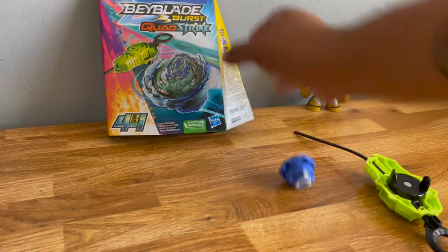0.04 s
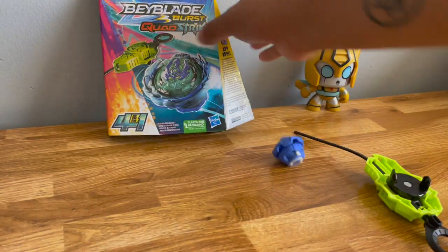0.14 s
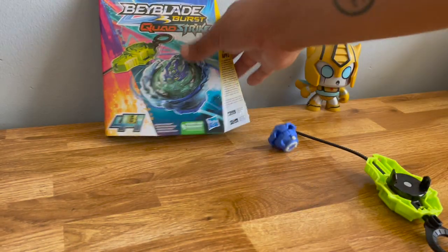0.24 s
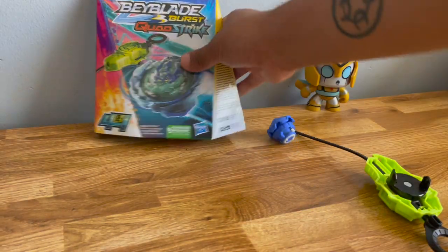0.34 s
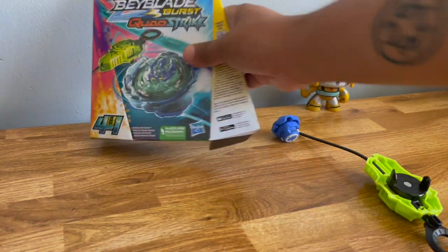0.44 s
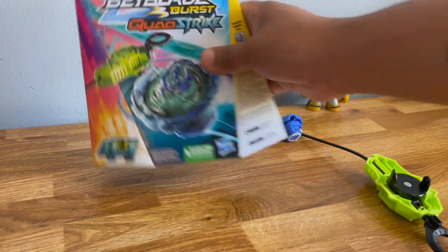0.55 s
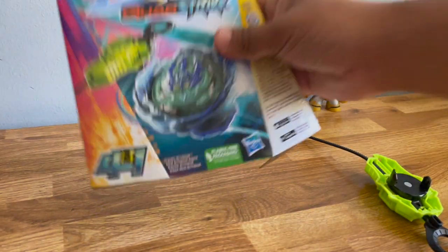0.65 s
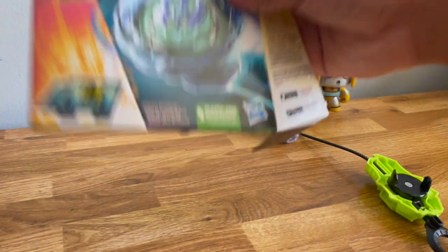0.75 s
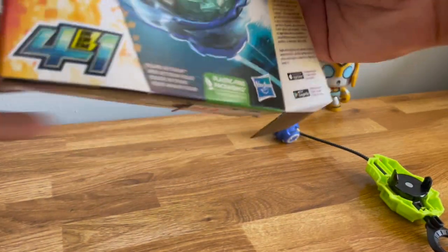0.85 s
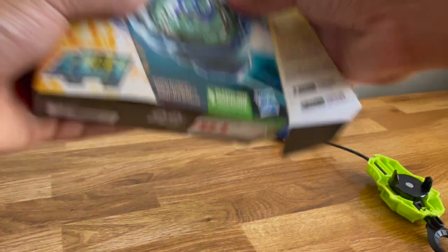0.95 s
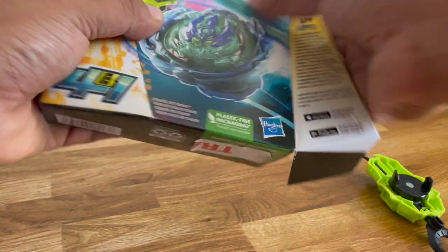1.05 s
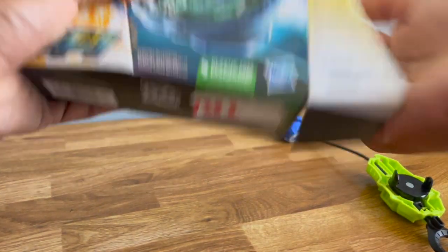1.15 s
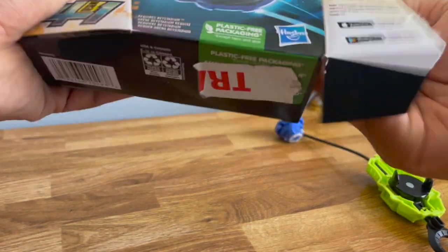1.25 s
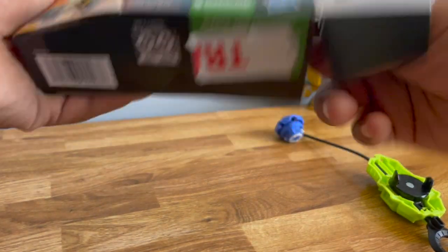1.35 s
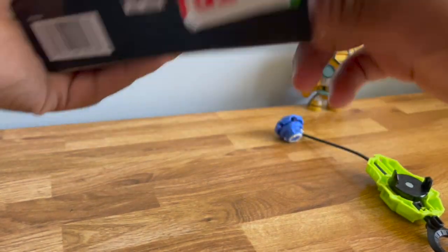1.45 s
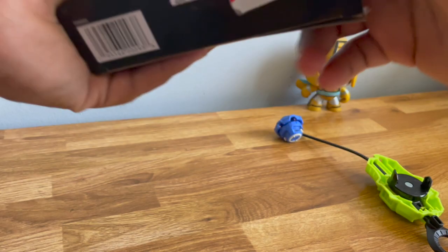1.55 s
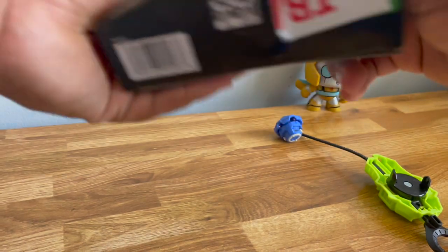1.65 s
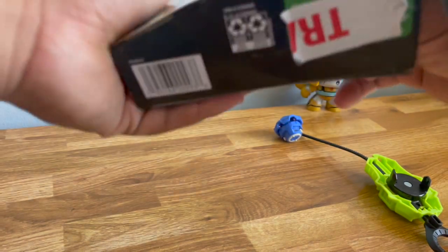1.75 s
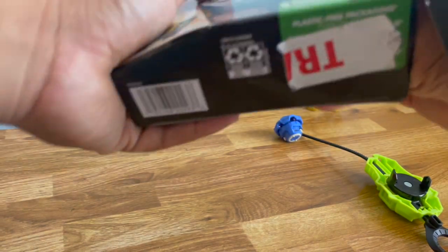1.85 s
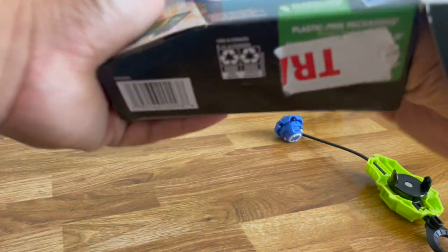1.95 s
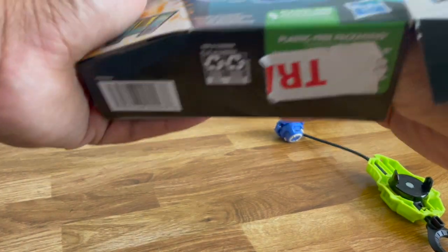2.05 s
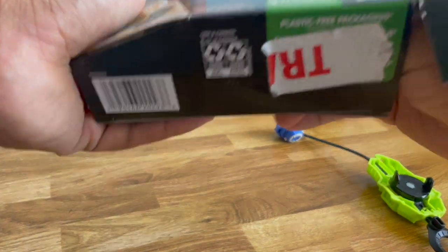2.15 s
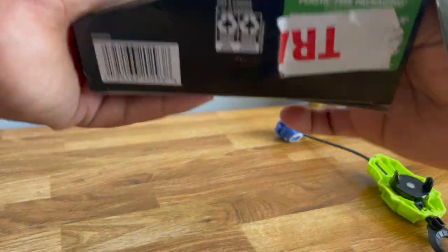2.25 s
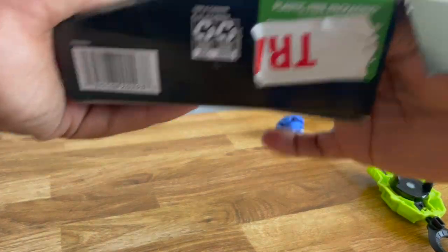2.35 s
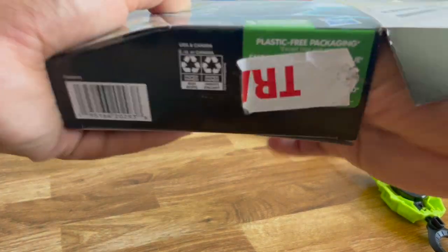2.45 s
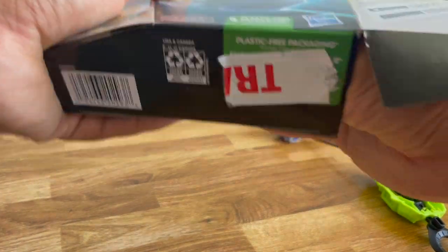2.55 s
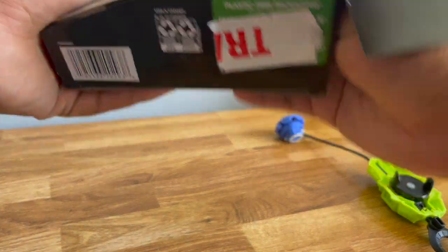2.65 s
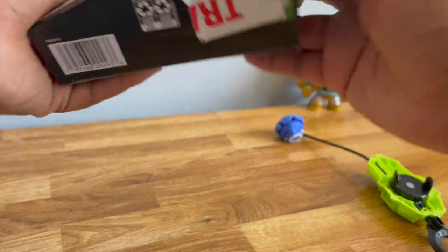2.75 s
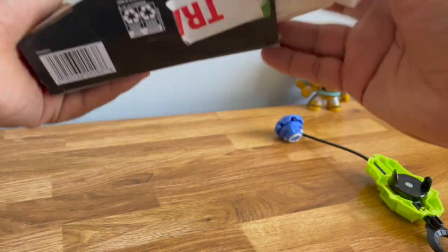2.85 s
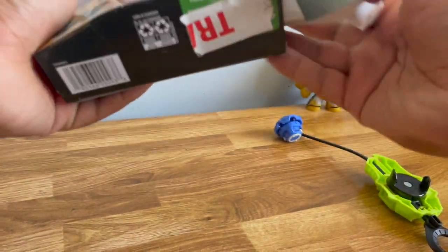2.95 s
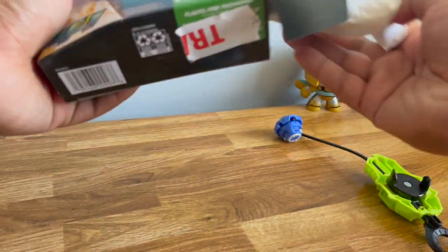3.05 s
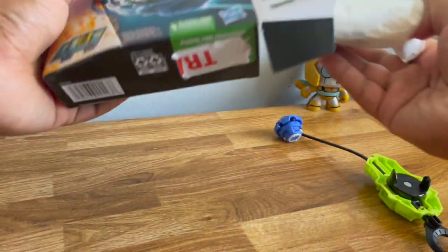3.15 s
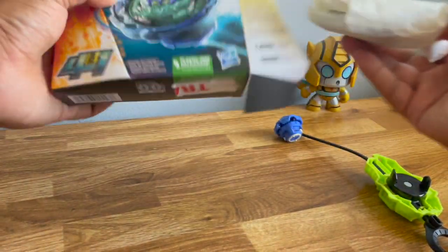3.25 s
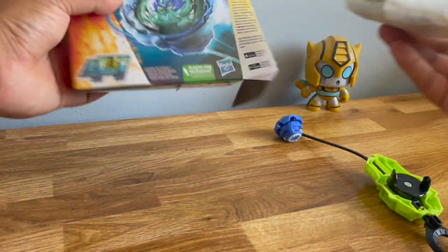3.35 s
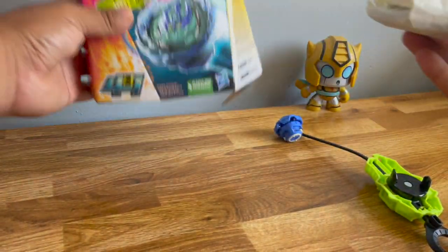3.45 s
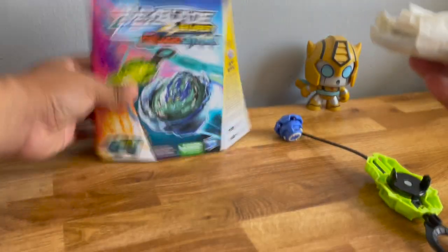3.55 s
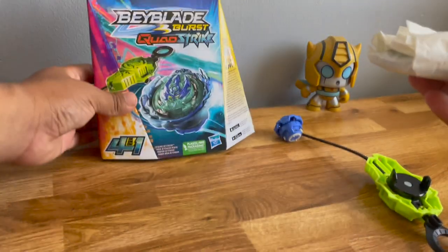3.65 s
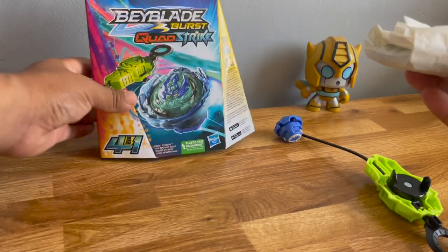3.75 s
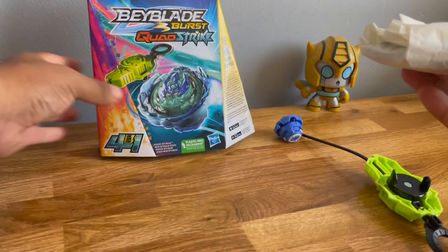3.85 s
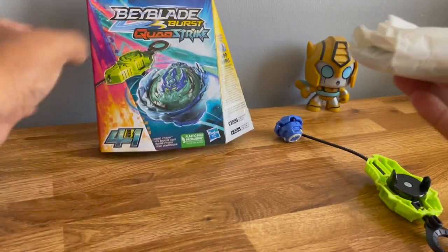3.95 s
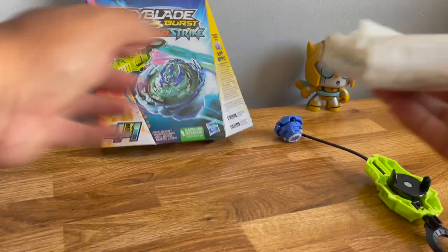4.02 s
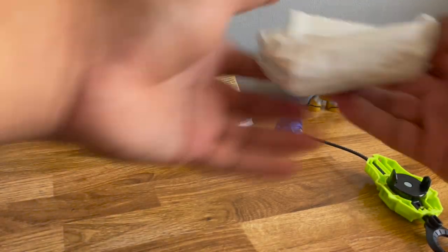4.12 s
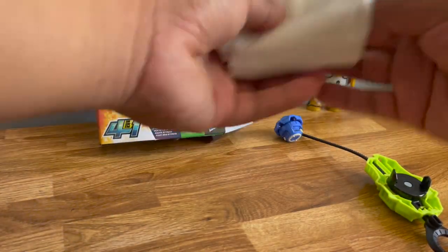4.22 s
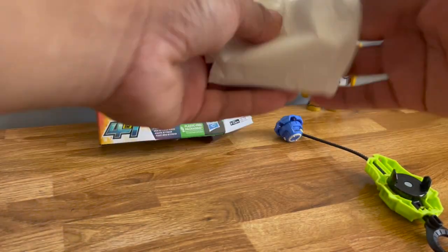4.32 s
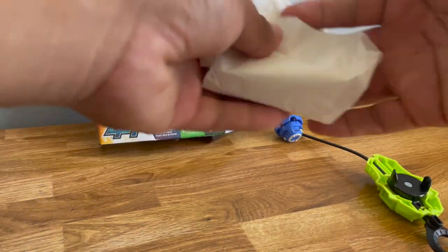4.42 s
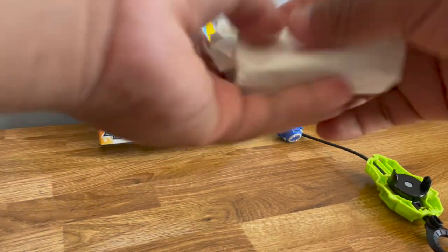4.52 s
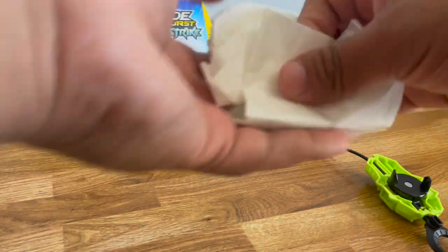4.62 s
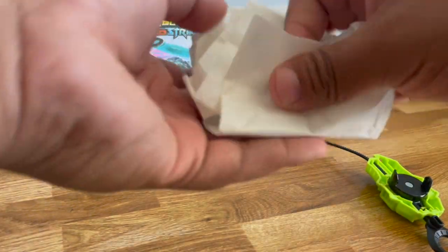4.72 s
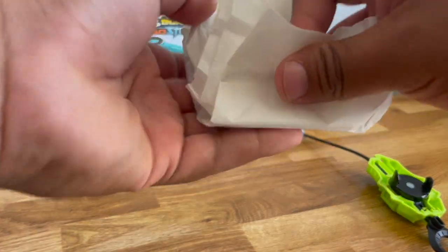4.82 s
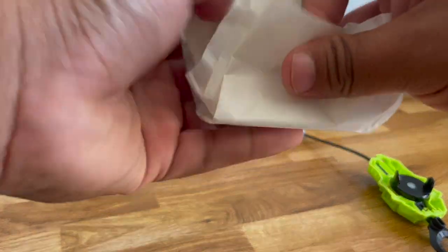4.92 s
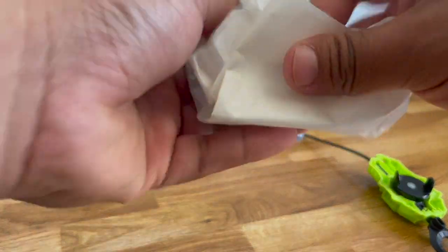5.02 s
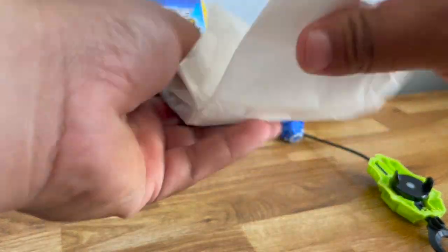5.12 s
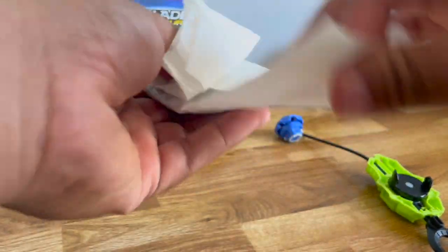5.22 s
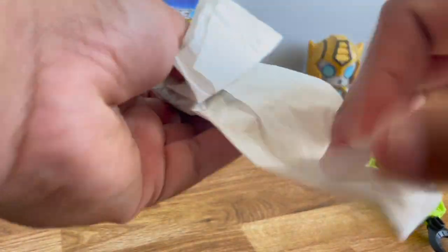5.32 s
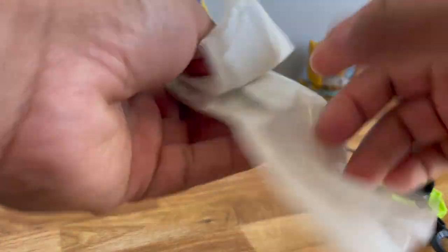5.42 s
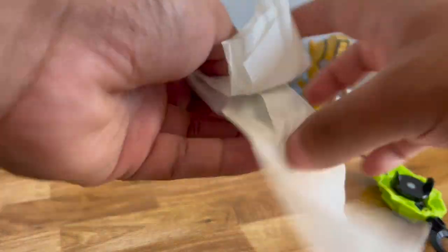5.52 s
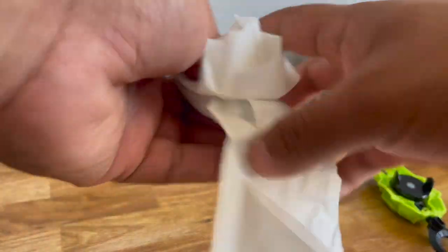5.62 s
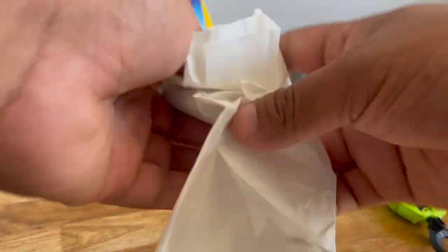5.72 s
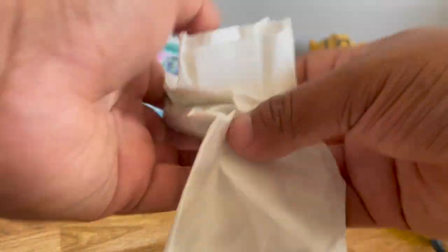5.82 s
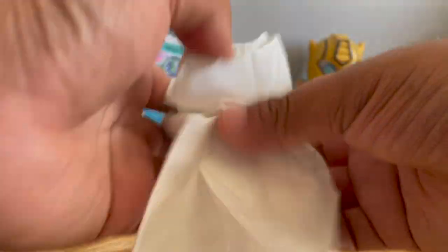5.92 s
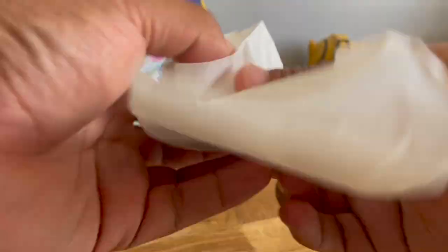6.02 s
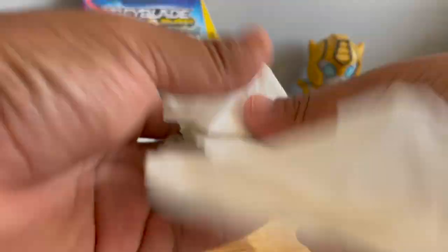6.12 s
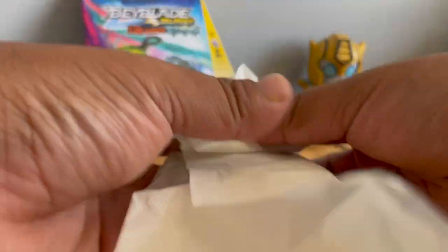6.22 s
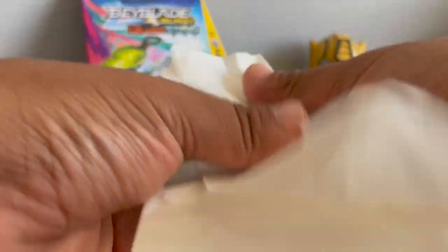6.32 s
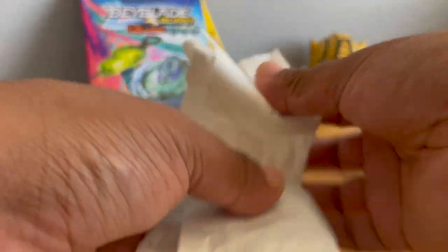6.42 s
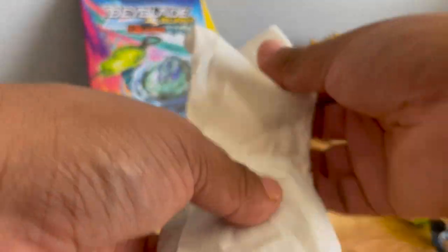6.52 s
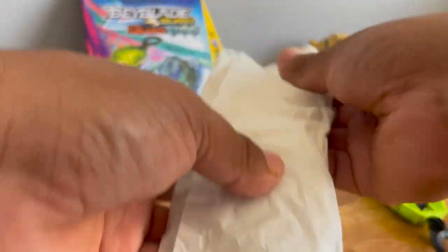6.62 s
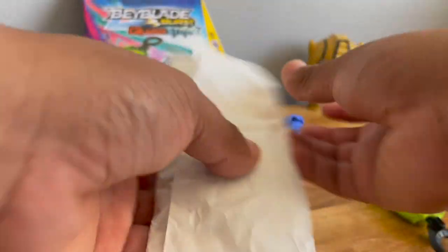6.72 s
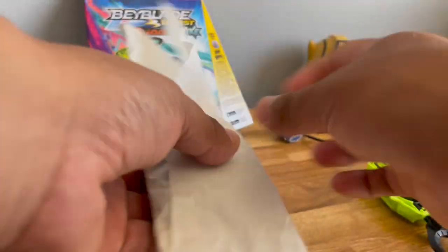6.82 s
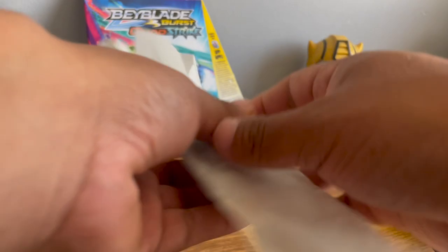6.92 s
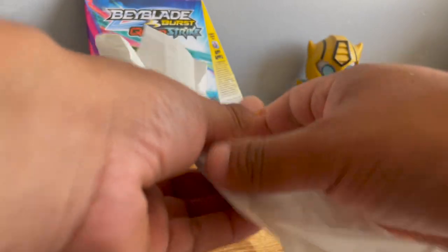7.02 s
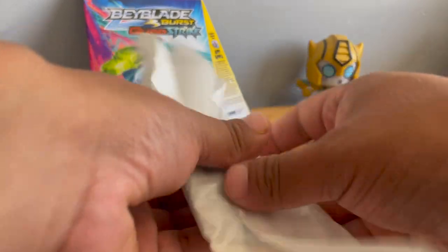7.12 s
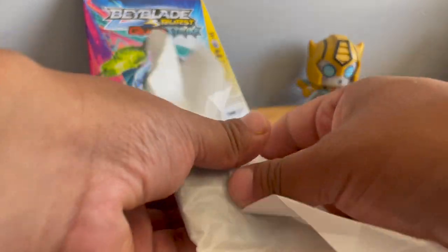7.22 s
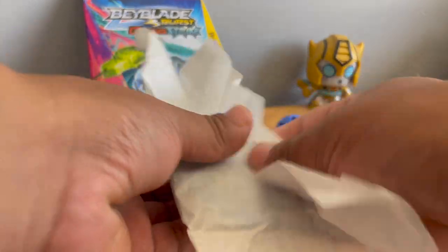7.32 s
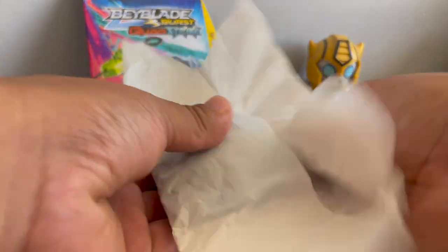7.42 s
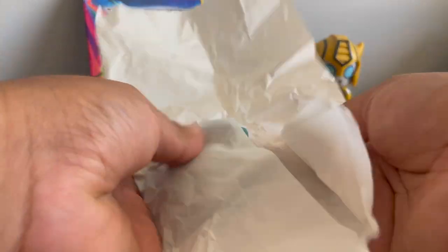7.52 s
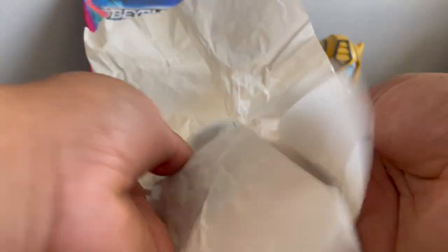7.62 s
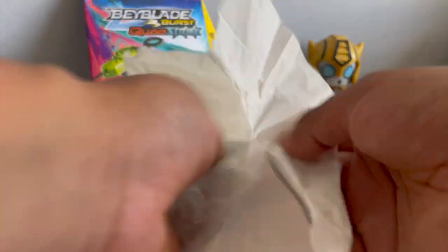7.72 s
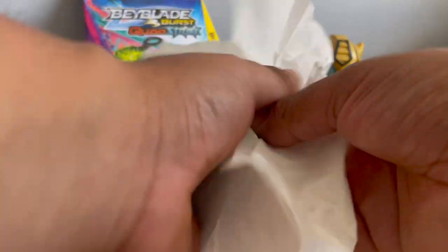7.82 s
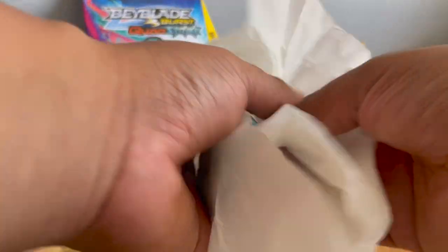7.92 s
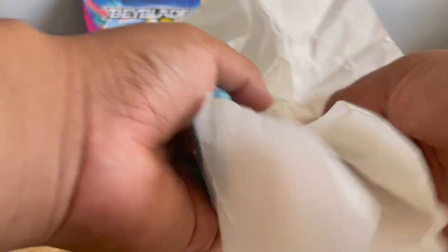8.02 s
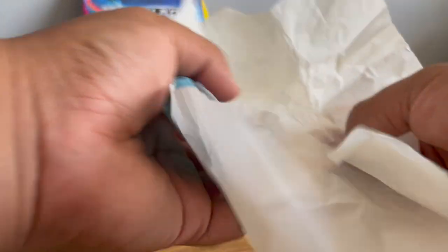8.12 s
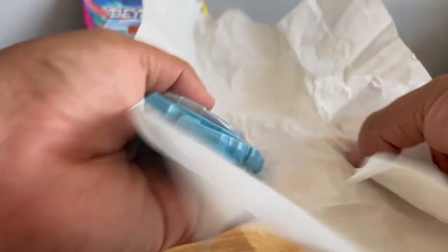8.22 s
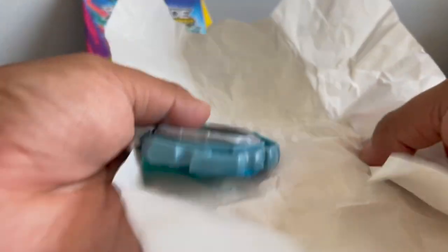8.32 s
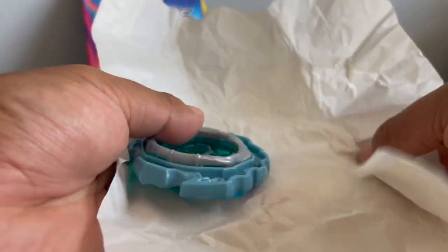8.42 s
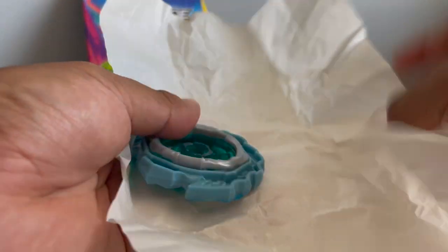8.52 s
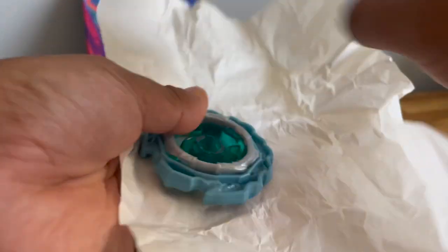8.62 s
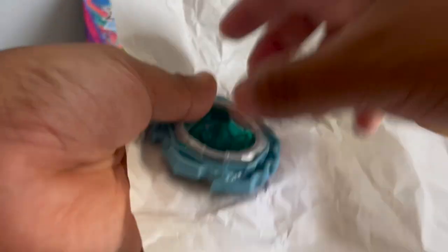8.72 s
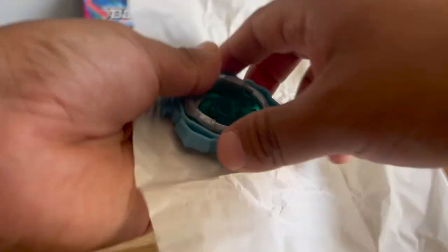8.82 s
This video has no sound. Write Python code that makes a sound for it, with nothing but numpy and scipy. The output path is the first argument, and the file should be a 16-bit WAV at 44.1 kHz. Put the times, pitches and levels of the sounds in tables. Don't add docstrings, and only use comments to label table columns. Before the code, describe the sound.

Close to a phone-like microphone on a table in a small, dry room, light plastic taps give way to cardboard knocks and scraping, uneven shakes. A muffled wooden thump follows as the box is put down. After a brief lull, thin paper snaps and rustles in clumps, becoming busiest and sharpest midway through unwrapping, then easing into scattered light crackles, with clean gaps between movements.

```python
import sys
import numpy as np
from scipy import signal
from scipy.fft import rfft, irfft, next_fast_len
from scipy.io import wavfile
from scipy.ndimage import uniform_filter1d

SR = 44100
rng = np.random.default_rng(int(sys.argv[2]) if len(sys.argv) > 2 else 0)


def inscribe(sig):
    pcm = np.round(np.clip(np.atleast_2d(sig).T, -1, 1) * 32767)
    wavfile.write(sys.argv[1], SR, pcm.astype(np.int16))


def volts_from_decibels(level):
    exponent = np.asarray(level, float) / 20
    return 10 ** exponent


N = 390726
SWAP_S = 4.05


def evened(x):
    return x / np.sqrt(np.mean(x ** 2) + 1e-20)


def read(points, hz):
    f, value = np.transpose(points)
    return np.interp(np.log(hz + 1), np.log(f + 1), value)


def add(mix, s, sound):
    part = mix[..., round(s * SR):][..., :sound.shape[-1]]
    part += sound[..., :part.shape[-1]]


def colour(x, points):
    hz = np.fft.rfftfreq(1024, 1 / SR)
    response = np.roll(irfft(volts_from_decibels(read(points, hz))), 512) * np.hanning(1024)
    return signal.oaconvolve(x, response[None], "same", axes=1)


def ring(modes, bright_db=0):
    t = np.arange(SR // 3) / SR
    out = np.zeros(len(t))
    for hz, db, t60 in modes:
        level_db = db + bright_db * np.log10(hz / modes[0][0]) - 60 * t / t60
        out += volts_from_decibels(level_db) * np.sin(2 * np.pi * hz * t)
    return out


def crease(noise, hz, t60, tuned, sharp, rise):
    t = np.arange(noise.shape[1]) / SR
    burst = noise * volts_from_decibels(-60 * t / t60) * np.minimum(t / rise, 1)
    peak = signal.iirpeak(np.clip(hz, 50, 15000), sharp, SR)
    rung = signal.lfilter(*peak, signal.lfilter(*peak, burst))
    out = (1 - tuned) * burst / abs(burst).max() + tuned * rung / abs(rung).max()
    return out / abs(out).max(1)[:, None]


def moves(t, release_db_per_s, per_crackle=1, per_weight=0):
    # start_s, length_s, final_crackle_db, swell_db, weight_db
    lifts = [(0, 0.074, -36, 8, -6.5), (0.095, 0.33, -50, -6.5, 1), (0.477, 0.016, -64.5, 12, 12),
             (0.569, 0.034, -53.5, 3.5, 2), (0.861, 0.014, -47, -0.5, -15), (0.923, 0.0032, -36, -0.5, 1),
             (0.964, 0.28, -49.5, -1, -16), (3.152, 0.04, -49, 20, -14), (3.387, 0.018, -64.5, 6, -3),
             (3.428, 0.13, -77.5, 4, -11), (3.56, 0.036, -37.5, 11.5, 12.5), (3.874, 0.06, -57, 11, -40),
             (4.005, 0.063, -56.5, 3.5, -28)]
    shakes = [(1.272, 0.015, -35, 11, -10.5), (1.32, 0.21, -44, -4, -5), (1.563, 0.073, -33, 18, -5.5),
              (1.629, 0.084, -46.5, 14.5, -2), (1.763, 0.12, -34.5, 7.5, -12.5),
              (1.933, 0.27, -56.5, -9.5, -23.5), (2.05, 0.11, -38, 0.5, -21),
              (2.2, 0.1, -51.5, -8.5, -19.5), (2.26, 0.023, -32, 0, -12.5),
              (2.341, 0.056, -34.5, 9.5, -14.5), (2.433, 0.057, -34.5, 4.5, -21),
              (2.577, 0.22, -30.5, 9, -25.5), (2.831, 0.14, -52.5, -15, -8.5),
              (2.951, 0.12, -42.5, -7.5, -14)]
    pulls = [(4.067, 0.087, -53.5, -5.5, -1), (4.144, 0.24, -32.5, 10, -24.5),
             (4.423, 0.19, -46.5, -9, -24.5), (4.546, 0.02, -31.5, 3.5, -25),
             (4.597, 0.046, -33, -4, -28.5), (4.67, 0.15, -37.5, 0.5, -29.5), (4.854, 0.22, -37, 5, -31),
             (5.121, 0.091, -35, 12.5, -21.5), (5.258, 0.11, -40, -7.5, -22.5), (5.38, 0.33, -39, 1, -23.5),
             (5.699, 0.12, -43, -12, -23.5), (5.843, 0.13, -31.5, 9.5, -29.5),
             (6.002, 0.14, -44, -12.5, -31), (6.155, 0.11, -36.5, 8, -36.5),
             (6.281, 0.039, -44.5, -7.5, -17.5)]
    spreads = [(6.38, 0.14, -39.5, -5, -24.5), (6.488, 0.14, -32.5, -0.5, -23),
               (6.645, 0.087, -54.5, -16, -36.5), (6.691, 0.068, -54, -15, -37),
               (6.801, 0.028, -46, 3, -42), (6.896, 0.033, -33, 18, -33), (6.985, 0.012, -54.5, -7.5, -43),
               (7.015, 0.11, -26.5, 24, -27), (7.154, 0.015, -36.5, -1, -22.5),
               (7.212, 0.23, -32, 1.5, -24), (7.492, 0.16, -43.5, -11, -21), (7.684, 0.24, -35, 6, -21.5),
               (7.873, 0.046, -41.5, -7, -17), (7.981, 0.025, -40, -8.5, -19), (8.032, 0.026, -53, 24, -3),
               (8.103, 0.063, -48, -2.5, -13), (8.191, 0.07, -35, 14.5, -19.5),
               (8.302, 0.021, -29.5, 3.5, -26.5), (8.328, 0.04, -45, 17.5, -35.5),
               (8.409, 0.005, -41, -9, -22.5), (8.458, 0.07, -52.5, -6, -16),
               (8.513, 0.069, -65.5, 8.5, -1), (8.629, 0.026, -51, -6.5, -70),
               (8.74, 0.059, -33.5, 20, -19), (8.803, 0.069, -35, 12, -24.5)]
    attack_db_per_s, still_db = 1398, -102
    start, length, db, swell, weight = np.transpose(lifts + shakes + pulls + spreads)[..., None]
    progress = np.clip((t - start) / np.maximum(length, .005), 0, 1)
    held = db - swell * (1 - progress)
    held -= attack_db_per_s * np.maximum(start - t, 0)
    held -= release_db_per_s * np.maximum(t - start - length, 0)
    level = per_crackle * (held + 40) - 40 + per_weight * weight
    return 10 * np.log10((volts_from_decibels(level) ** 2).sum(0) + volts_from_decibels(still_db) ** 2)


def small_creases(force):
    per_s, count = 1600, 20
    spread_db, clump_db, rub = 3.5, 3.5, 0.28
    clumps = evened(uniform_filter1d(uniform_filter1d(rng.standard_normal(N), 500), 200))
    size_db = spread_db * np.minimum(rng.exponential(1, N), 3.4) + clump_db * np.minimum(clumps, 1.8)
    size = volts_from_decibels(size_db) * (rng.random(N) < per_s / SR)
    kind, out = rng.integers(0, count, N), np.zeros((2, N))
    for k, hz in enumerate(np.geomspace(250, 12000, count)):
        grain = crease(rng.standard_normal((2, 512)), hz, t60=.0022, tuned=.22, sharp=2.3, rise=.0004)
        grain /= np.linalg.norm(grain[0])
        out += signal.oaconvolve((size * (kind == k))[None], grain, axes=1)[:, :N]
    slide = np.where(np.arange(N) / SR < SWAP_S, 2.5, 1)
    crackle = force * evened(out + volts_from_decibels(-17.5) * room(out))
    return crackle + rub * slide * rng.standard_normal((2, N))


def crinkle():
    hands_hz = [230, 900, 2100, 6500, 11000]
    # pitch_hz, level_db
    card = [(70, 6), (140, 4), (400, 1.5), (700, 0), (1120, -5), (1550, 5.5), (1950, 3), (2250, 2),
            (3000, 4), (7500, -3.5), (11000, -12), (13500, -22), (16000, -20)]
    # pitch_hz, level_db
    sheet = [(70, 22), (130, 20), (400, 6), (700, 7), (1000, 2), (1500, 7.5), (4000, 5.5), (7500, 1.5),
             (11000, -9.5), (13500, -19.5), (16000, -16)]
    # start_s, stop_s, pitch_hz,
    # width_hz, level_db
    cavity = [
        (8.03, 12, 1800, 450, -1),
        (8.03, 8.6, 1060, 560, 2),
        (3.85, 4.05, 3150, 300, -10),
        (2.6, 4.4, 2300, 200, 4),
        (2.45, 4.4, 1170, 230, -8),
        (2.9, 4.1, 2800, 2100, 4),
        (0.54, 0.88, 1600, 630, -10),
        (0.42, 0.63, 830, 530, -21.5),
        (6.4, 7.5, 880, 160, 4.5),
    ]
    bumpy_db, patchy_db, cavity_wander = 7.5, 2.5, 0.027
    release, low_release = 386.5, 311.5
    s = np.arange(0, N / SR + .1, .002)
    crackle = moves(s, release)
    thump = moves(s, low_release, per_weight=0.97) + 6
    knuckles = evened(uniform_filter1d(rng.standard_normal(len(s)), size=24))
    thump += bumpy_db * np.minimum(knuckles, 1)
    body = moves(s, low_release, per_weight=0.59) + 15
    fizz = moves(s, release, per_crackle=1.37, per_weight=-0.19) + 0.5
    upper = crackle + 0.26 * np.minimum(crackle + 48, 0)

    force = np.clip((np.interp(np.arange(N) / SR, s, crackle) + 62) / 18, .05, 1)
    hz, t, z = signal.stft(small_creases(force), SR, nperseg=512, noverlap=384)
    slow_power = uniform_filter1d(uniform_filter1d(abs(z[0]) ** 2, 24, 1), 40, 0)
    z /= np.sqrt(slow_power + 1e-20)
    levels = [np.interp(t, s, layer) for layer in (thump, body, crackle, upper, fizz)]
    shares = [np.interp(np.log(hz + 1), np.log(hands_hz), row) for row in np.eye(len(levels))]
    field_db = np.transpose(shares) @ np.array(levels)

    field_db += np.where(t < SWAP_S, read(card, hz)[:, None], read(sheet, hz)[:, None])
    wander = 1 + cavity_wander * evened(uniform_filter1d(rng.standard_normal(len(t)), size=40))
    for start, stop, cavity_hz, width, cavity_db in cavity:
        hump = np.exp(-((hz[:, None] - cavity_hz * wander) / width) ** 2)
        field_db += cavity_db * hump * (t > start) * (t < stop)
    patches = evened(uniform_filter1d(uniform_filter1d(rng.standard_normal(z[0].shape), 7, 0), 9, 1))
    field_db += patchy_db * patches * np.minimum(hz / 900, 1)[:, None]
    return signal.istft(z * volts_from_decibels(field_db - 19.0), SR, nperseg=512, noverlap=384)[1][:, :N]


def snaps():
    # start_s, peak_db, ring_hz
    card_snaps = [(0.9268, -21.5, 1520), (1.0605, -15, 2440), (1.1157, -21, 2040), (1.2835, -48, 2750),
                  (1.7085, -19.5, 1310), (1.9107, -16, 1480), (1.9756, -33.5, 7400), (2.019, -18, 1410),
                  (2.2612, -17, 1250), (2.2775, -15, 1550), (2.378, -13, 1550), (2.7902, -11, 3230),
                  (2.9313, -22, 2870), (2.996, -11, 2220), (3.1356, -20.5, 2300), (3.2964, -41.5, 2090),
                  (3.3847, -36, 2820), (3.8574, -49, 1990), (4.0632, -39, 902)]
    tissue_snaps = [(4.3447, -15.5, 2000), (4.429, -7.5, 1490), (4.5969, -14, 2190), (4.6182, -4.5, 1940),
                    (4.634, -4, 1870), (4.687, -9, 3330), (5.165, -23, 5980), (5.2508, -10, 3380),
                    (5.4403, -6.5, 2700), (5.4556, -13, 3970), (5.5629, -15, 2200), (5.6613, -11.5, 2980),
                    (5.7003, -8.5, 1430), (5.896, -5.5, 4800), (5.926, -12, 5070), (5.966, -7, 4830),
                    (6.0564, -7, 5000),
                    (6.369, 0, 3350), (6.428, -3, 3460), (6.489, -9, 1330), (6.557, -4, 3700),
                  (6.619, -7, 3760), (6.697, -6, 3200), (6.748, -11.5, 1300), (6.8235, -7, 4100),
                  (6.9292, -6, 4570), (7.024, -29, 3080), (7.053, -10, 2130), (7.077, -10, 1680),
                  (7.104, -7, 2150), (7.198, -2.5, 2880), (7.217, -6.5, 2100), (7.247, -9, 2280),
                  (7.2776, -10, 6250), (7.347, -6, 3000), (7.388, -10.5, 4830), (7.402, -6, 3660),
                  (7.509, -5, 1280), (7.547, -15, 6200), (7.562, -7, 3270), (7.606, -2.5, 1340),
                  (7.628, -5, 3020), (7.6615, 1.5, 920), (7.715, -4.5, 2580),
                    (7.805, -12.5, 5030), (7.834, -11.5, 6650), (7.8439, -6.5, 3570), (7.879, -10, 3400),
                    (7.918, -1.5, 2790), (7.9815, -3, 1240), (7.9923, -9, 1340), (8.121, -8.5, 1170),
                    (8.217, -13, 4500), (8.3115, -12, 4500), (8.332, -9, 6800), (8.338, -0.5, 3120),
                    (8.3623, -19, 4840), (8.4015, -7.5, 4870), (8.4492, -11, 1400), (8.4832, -30, 5350),
                    (8.4933, -12.5, 4840), (8.5079, -18, 5160), (8.5587, -21.5, 10800), (8.614, -38, 6200),
                    (8.6266, -25, 6440), (8.6364, -17.5, 3980), (8.663, -23, 6960), (8.72, -25.5, 7000),
                    (8.7299, -15.5, 2980), (8.743, -17, 1330), (8.795, -13.5, 1330)]
    more_card_snaps = [
        (0.487, -34, 1440),
        (0.502, -48, 3700),
        (0.975, -31.5, 4820),
        (1.162, -32, 2989),
        (3.165, -34.5, 4900),
        (3.203, -29, 3500),
        (3.93, -44.5, 2060),
        (4.02, -33.5, 2130),
    ]
    shake_snaps = [(1.294, -16.5, 2800), (1.435, -36, 1360), (1.462, -26.5, 1520), (1.5977, -28, 1350),
                   (1.62, -19, 1210), (1.6785, -28, 3380), (1.7634, -46, 1640), (1.7898, -13, 1400),
                   (1.8147, -12.5, 1370), (1.862, -5, 1420), (1.939, -34, 1530), (2.0526, -31, 1580),
                   (2.1137, -25.5, 1490), (2.134, -28, 1470), (2.254, -17, 1560), (2.339, -32, 1670),
                   (2.4007, -12.5, 1743), (2.5865, -30, 3840), (2.604, -12, 1560), (2.684, -24.5, 3430),
                   (2.823, -20, 1817), (2.8584, -33, 806), (2.9431, -10, 2850), (3.071, -27, 1880)]
    more_tissue_snaps = [(4.1627, -21, 1590), (4.2253, -14, 1990), (4.2888, -24, 2050), (4.323, -13.5, 3460),
                           (4.363, -18, 2850), (4.379, -18, 3360), (4.46, -18, 1460), (4.508, -17, 2150),
                           (4.553, -10, 1650), (4.6544, -18, 1780), (4.692, -18.5, 3370), (4.7113, -20.5, 3860),
                           (4.732, -12, 4300), (4.7405, -22, 5470), (4.7607, -16.5, 1980), (4.783, -24, 4400),
                           (4.8272, -18, 2930), (4.8524, -29.5, 4430), (4.8906, -17.5, 1600), (4.945, -17, 2780),
                           (4.9987, -16, 2980), (5.04, -15, 4380), (5.0875, -22, 5040), (5.143, -29, 2900),
                           (5.1786, -26, 5960), (5.1917, -11, 1357), (5.2797, -14, 1770), (5.323, -12, 3290),
                           (5.357, -29.5, 5370), (5.3733, -22.5, 5810), (5.42, -25, 2910), (5.493, -24, 1650),
                           (5.5778, -11.5, 5420), (5.6363, -15, 2810), (5.67, -14, 3990), (5.721, -21, 2980),
                           (5.741, -20, 1730), (5.764, -20, 5000), (5.792, -13.5, 2910), (5.8198, -20.5, 6860),
                           (5.852, -18.5, 4040), (5.8715, -31, 5900), (5.9963, -15.5, 1240), (6.017, -17, 5000),
                           (6.1398, -20, 2800), (6.1769, -23, 2200), (6.197, -13, 4440), (6.2442, -18.5, 4560),
                           (6.2708, -23, 6540),
                           (6.308, -29, 1750), (6.334, -21, 4820), (6.39, -10, 3670), (6.4667, -15, 2830),
                         (6.5011, -9, 1310), (6.5306, -24, 2790), (6.5874, -23, 1650), (6.6361, -10, 1230),
                         (6.708, -11, 2790), (6.729, -22, 5090), (6.7417, -33, 1370), (6.78, -18, 2220),
                         (6.7972, -29, 4250), (6.911, -25, 4520), (6.9622, -20, 2150), (7.037, -23, 1990),
                         (7.122, -7, 3000), (7.151, -6, 3550), (7.26, -11, 3200), (7.296, -7, 1290),
                         (7.3228, -15, 3320), (7.352, -7.5, 3500), (7.419, -9, 3000), (7.4523, -11, 4930),
                         (7.484, -20, 3520), (7.5192, -1.5, 3790), (7.5954, -12, 1350), (7.6517, -9, 4500),
                         (7.7014, -35, 2420), (7.738, -9, 4950), (7.9428, -7, 3360),
                           (8.0107, -9.5, 1000), (8.0555, -29, 1290), (8.1, -26, 1560), (8.163, -21, 4000),
                           (8.184, -21, 7400), (8.2113, -16, 7200), (8.243, -16, 5070), (8.2704, -24, 5000),
                           (8.285, -19, 3480), (8.295, -3, 3530), (8.3758, -9, 940), (8.4084, -8, 1110),
                           (8.4741, -19, 5150), (8.511, -25, 5560), (8.536, -26, 5350), (8.6566, -31, 5470),
                           (8.767, -28.5, 1050), (8.8258, -15, 1250), (8.839, -19, 4600), (8.8544, -16.5, 7200)]
    # pitch_hz, level_db
    snap_spectrum = [(100, -52), (400, -2), (1200, 1.5), (4000, -1), (8000, 11.5), (12000, 0.5),
                     (16000, -10.5)]
    rows = card_snaps + tissue_snaps
    rows = rows + more_card_snaps + shake_snaps + more_tissue_snaps
    out, noise = np.zeros((2, N)), rng.standard_normal((len(rows), 2, 1024))
    noise[np.transpose(rows)[0] > SWAP_S + .05, :, 14] = 4
    for (s, db, hz), n in zip(rows, noise):
        t60 = .0065 * (hz / 2500) ** -.05
        faint = np.clip(-(db + 14) / 12, 0, 1) * (s < SWAP_S)
        tuned = min(.45, hz / 4500) * (1 - faint) + faint
        sharp, rise = 2 + 4 * faint ** 2, .0003 + .004 * faint ** 2
        sound = crease(n, hz, t60 * (1 + faint), tuned, sharp, rise)
        top_hz = min((2.46 - faint) * hz, 20000)
        sound = signal.lfilter(*signal.butter(1 + 2 * round(faint), top_hz, fs=SR), sound)
        add(out, s, volts_from_decibels(db - 2.5) * sound)
    return colour(out, snap_spectrum)


def toy_part():
    # start_s, peak_db, brightness_db
    bounces = [
        (0.06, -26, 4),
        (0.075, -29, -7),
        (0.148, -19.5, 23),
        (0.199, -19.5, 7),
        (0.425, -31, 2),
        (0.476, -33.5, 13.5),
    ]
    # pitch_hz, level_db, t60_s
    part_modes = [(650, 0, .07), (1400, -5, .03), (1950, -6, .025), (2900, -14, .02), (4620, -24, .05)]
    # pitch_hz, level_db, t60_s
    rock_modes = [(670, -43, .07), (2800, -54, .05), (3250, -52, .03), (4620, -52, .11)]
    out, noise = np.zeros(N), rng.standard_normal((len(bounces), 400))
    for (s, db, bright_db), n in zip(bounces, noise):
        scuff = n * volts_from_decibels(-60 * np.arange(400) / SR / .018)
        sound = signal.oaconvolve(scuff, ring(part_modes, bright_db))
        add(out, s, volts_from_decibels(db) * sound / abs(sound).max())
        add(out, s, volts_from_decibels(db - 8) * signal.lfilter([.3], [1, -.7], 2 * scuff))
    rub = noise[-1] / np.linalg.norm(noise[-1])
    add(out, .588, signal.oaconvolve(rub, ring(rock_modes)) * 2)
    return out


def box():
    # start_s, peak_db, wall_hz, t60_s
    knocks = [
        (0.929, -23, 520, 0.027),
        (1.0597, -11.5, 284, 0.028),
        (1.065, -31, 247, 0.059),
        (1.336, -26, 294, 0.039),
        (2.273, -47.5, 315, 0.054),
        (3.206, -43.5, 470, 0.043),
        (3.232, -37, 313, 0.041),
        (3.399, -50.5, 640, 0.051),
        (3.417, -52.5, 590, 0.051),
        (3.515, -59.5, 645, 0.041),
    ]
    # start_s, blow_db, length_s
    landing = [
        (3.551, -43, 0.015),
        (3.577, -12, 0.0068),
        (3.603, -23.5, 0.068),
        (3.618, -20, 0.03),
    ]
    # pitch_hz, level_db, t60_s
    table_modes = [(70, -30, .14), (140, -1, .18), (230, -6, .07), (407, 4, .07), (650, -8, .045),
                   (890, -13, .04)]
    out, t = np.zeros(N), np.arange(4000) / SR
    for s, db, hz, t60 in knocks:
        wall = [(hz, 0, t60), (1.9 * hz, -6, 0.41 * t60), (1.0 * hz, -10, 0.19 * t60)]
        add(out, s, volts_from_decibels(db) * ring(wall))
    noise = rng.standard_normal((len(landing), len(t)))
    for (s, db, length), n in zip(landing, noise):
        blow = n * np.exp(-t / length) * (t < 4 * length)
        sound = signal.oaconvolve(blow, ring(table_modes))
        add(out, s, volts_from_decibels(db - 4.5) * sound / abs(sound).max())
    return out


def room(x):
    # pitch_hz, t60_s
    decay = [(100, 0.26), (500, 0.23), (1000, 0.14), (2000, 0.17), (6000, 0.0083), (15000, 0.026)]
    taps = np.zeros((2, SR // 2))
    at = np.arange(150, SR // 2 - 20, 20)
    at = at + rng.integers(0, 20, (2, len(at)))
    np.put_along_axis(taps, at, rng.choice([-1., 1.], at.shape), 1)
    hz, t, z = signal.stft(taps, SR, nperseg=256)
    tail = signal.istft(z * volts_from_decibels(-60 * t / read(decay, hz)[:, None]), SR, nperseg=256)[1]
    return signal.fftconvolve(x, tail / np.linalg.norm(tail[0]), axes=1)[:, :N]


def noise_floor():
    # pitch_hz, level_db
    floor_spectrum = [(50, -23.5), (300, -11.5), (900, -21), (3000, -22), (16000, -41)]
    return volts_from_decibels(-100.5) * evened(colour(rng.standard_normal((2, N)), floor_spectrum))


def scene():
    hands = crinkle()
    near = snaps() + toy_part()
    knocks = box()
    answer = volts_from_decibels(-14.0) * room(near + volts_from_decibels(-2.5) * knocks)
    return near + hands + answer + knocks + noise_floor()


def ports(dry):
    # pitch_hz, likeness_0_to_1
    port_alike = [(320, .97), (600, .66), (1000, .84), (2500, .68), (5500, .7), (7300, .9), (8200, .97),
                  (9500, .85), (10600, .98), (13000, .97), (14000, .955)]
    # pitch_hz, level_db
    port_db = [(60, 3.5), (400, 5.5), (1300, 3), (2400, 6), (5000, 5), (7500, 0), (16000, 0)]
    # pitch_hz, lead_rad
    port_turn = [(0, 0), (1300, .1), (2500, .6), (5200, .4), (6800, -1.0), (7600, -2.7), (8800, -3.5),
                 (10500, -6.0), (12900, -6.55), (13800, -9.1), (16500, -9.7)]
    # start_s, extra_left_over_right_db
    sideways = [
        (0, -1),
        (0.8, 1.5),
        (1.7, -1.5),
        (3.3, -0.5),
        (3.7, 1.5),
        (4.2, -1),
        (6.8, 3),
        (8.8, -0.5),
    ]
    size = next_fast_len(N + 4096)
    hz = np.fft.rfftfreq(size, 1 / SR)
    left, other = rfft(dry, size) / (1 + (92 / (hz + 1)) ** 4)
    alike = read(port_alike, hz)
    right = alike * left + np.sqrt(1 - alike ** 2) * other
    right *= volts_from_decibels(-read(port_db, hz)) * np.exp(-1j * np.interp(hz, *np.transpose(port_turn)))
    lean = np.interp(np.arange(N) / SR, *np.transpose(sideways)) / 2
    return irfft(np.array([left, right]), size)[:, :N] * volts_from_decibels(np.array([lean, -lean]))


def treble_gaps(x):
    box_under_db, tissue_under_db, faint_db, jump_db = 10, 11, -93, 2.
    hz, t, z = signal.stft([x[0] + x[1], x[0] - x[1]], SR, nperseg=1024)
    power = (abs(z[:, :512]) ** 2).reshape(2, 32, 16, -1).mean(2)
    band_db = 10 * np.log10(uniform_filter1d(power, 3, 2) + 1e-20)
    treble_db = 10 * np.log10(power[:, 8:].sum((0, 1)) + 1e-20)
    steady = np.diff(treble_db, prepend=0) < jump_db
    under_db = np.where(t < SWAP_S, box_under_db, tissue_under_db)
    lost = ((band_db < band_db[::-1] - under_db) & steady) | (band_db < faint_db)
    z[:, :512] *= 1 - np.repeat(lost, 16, axis=1) * (hz[:512, None] > 6900)
    z[:, hz > 15900] *= ~steady * (np.roll(steady, 1) & np.roll(steady, 2))
    mid, side = signal.istft(z, SR, nperseg=1024)[1][:, :N] / 2
    return np.array([mid + side, mid - side])


def band_limit(x):
    return signal.sosfilt(signal.butter(12, 16670, fs=SR, output="sos"), x)


def record(dry):
    mix = treble_gaps(ports(dry))
    return band_limit(mix)


dry = scene()
out = record(dry)
inscribe(out)
```